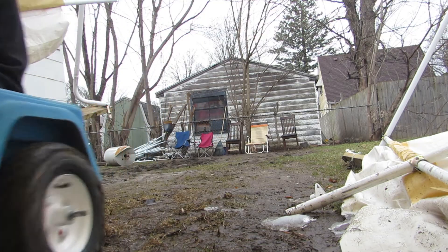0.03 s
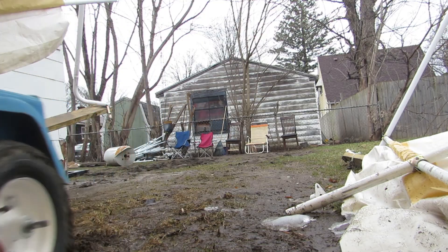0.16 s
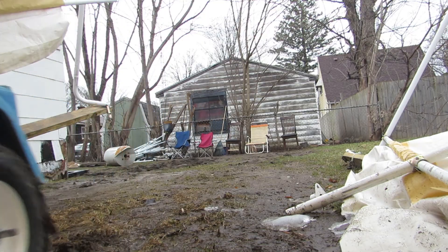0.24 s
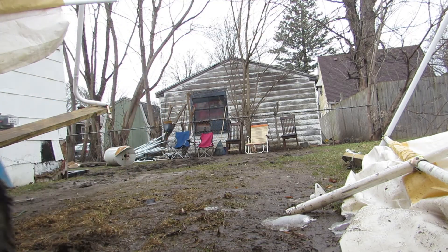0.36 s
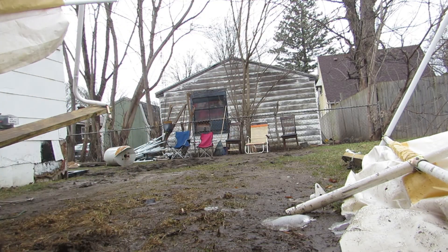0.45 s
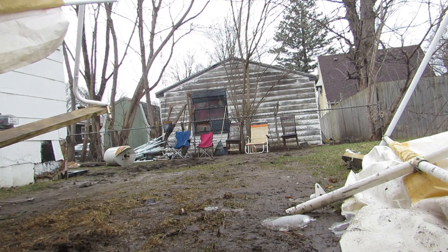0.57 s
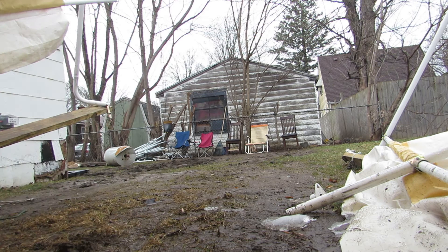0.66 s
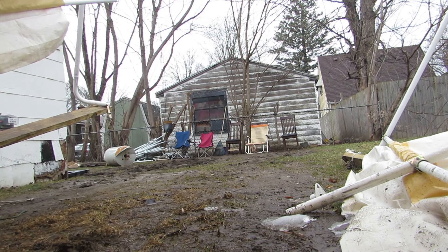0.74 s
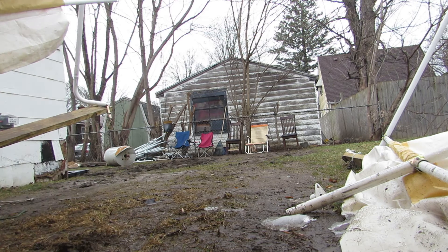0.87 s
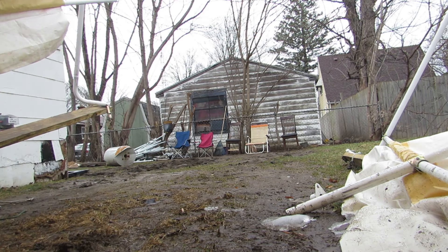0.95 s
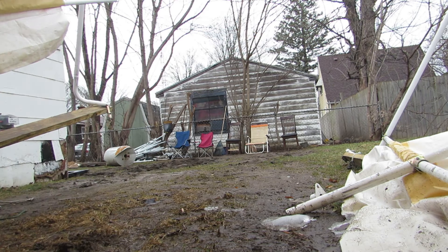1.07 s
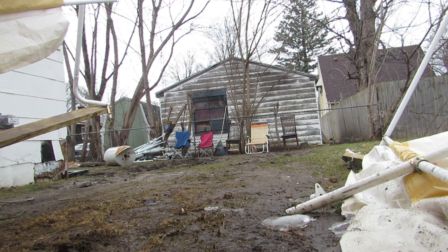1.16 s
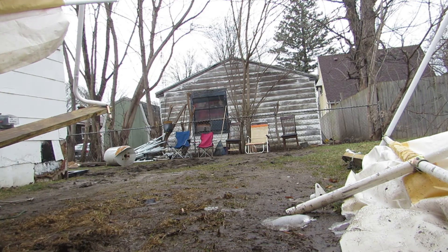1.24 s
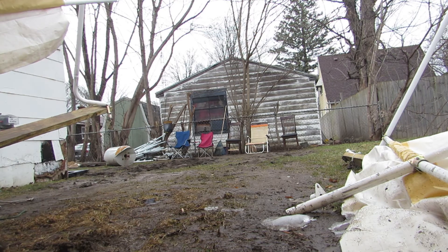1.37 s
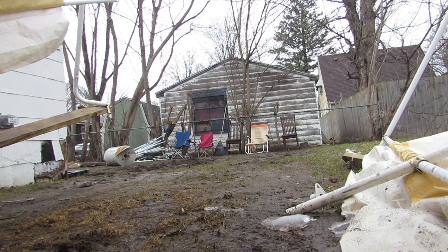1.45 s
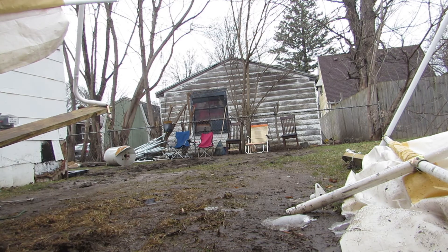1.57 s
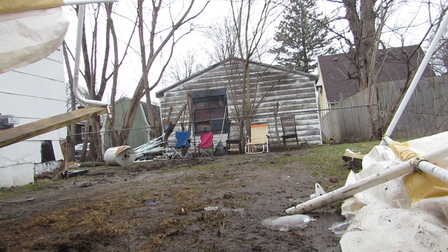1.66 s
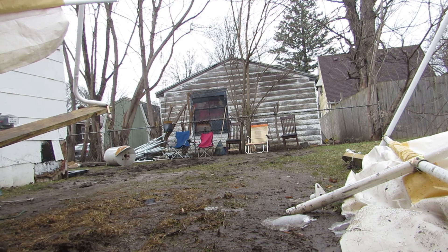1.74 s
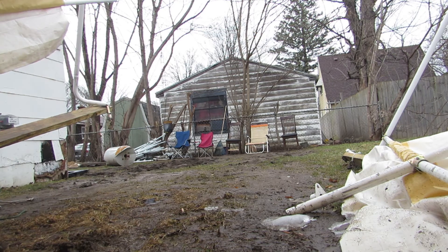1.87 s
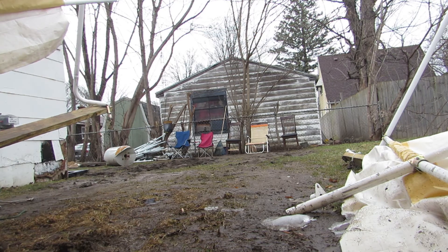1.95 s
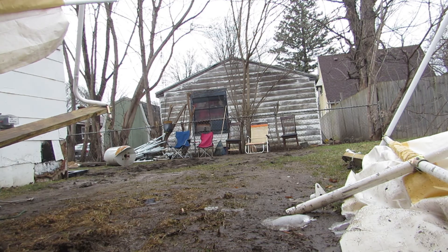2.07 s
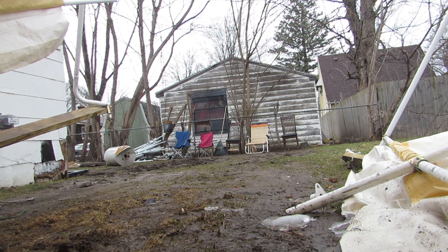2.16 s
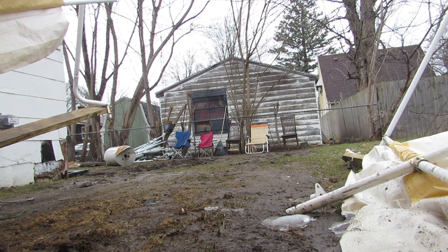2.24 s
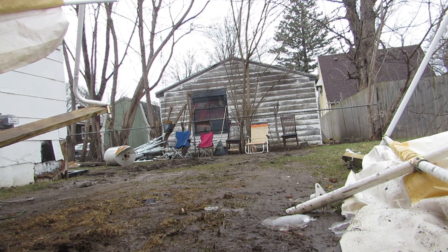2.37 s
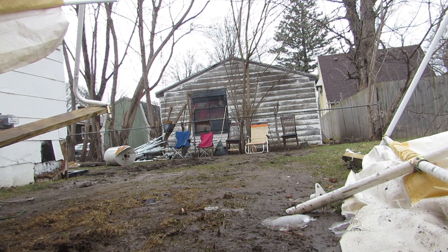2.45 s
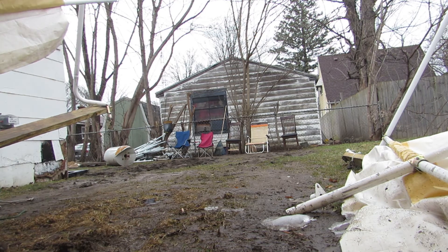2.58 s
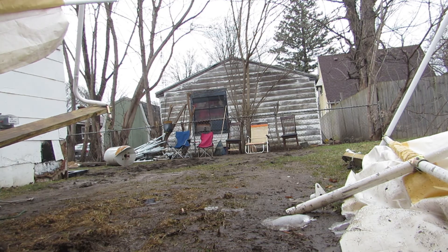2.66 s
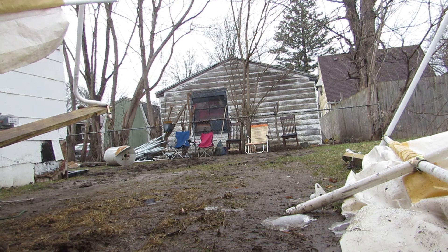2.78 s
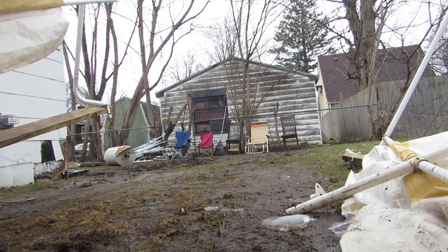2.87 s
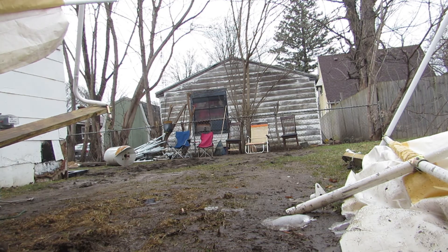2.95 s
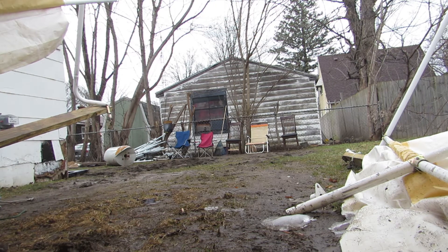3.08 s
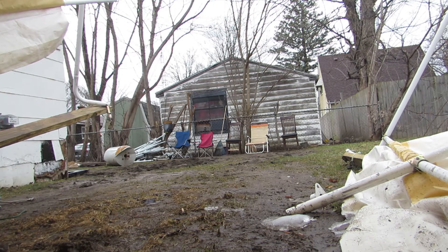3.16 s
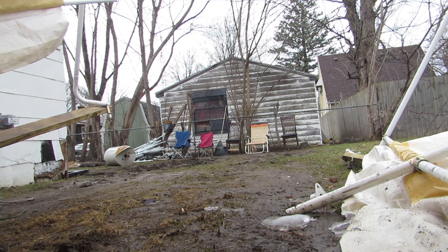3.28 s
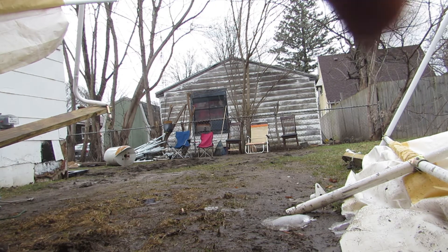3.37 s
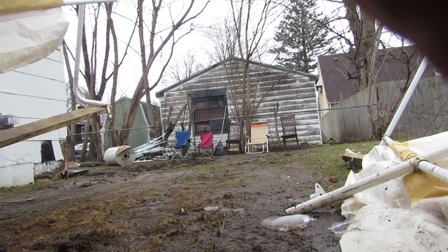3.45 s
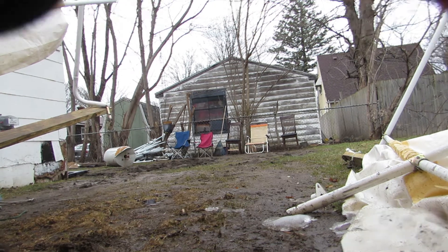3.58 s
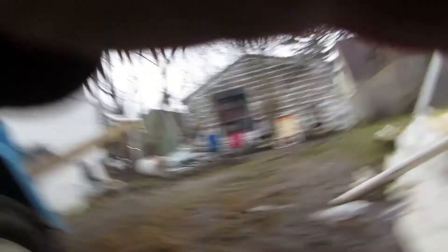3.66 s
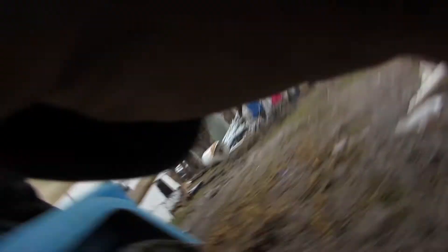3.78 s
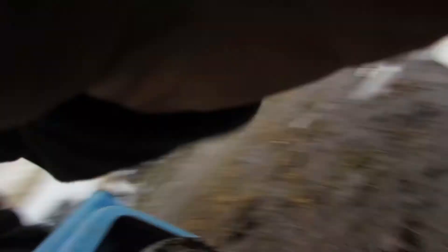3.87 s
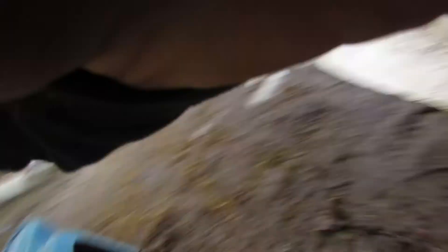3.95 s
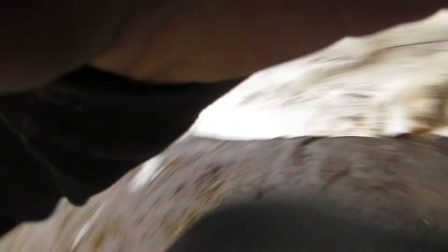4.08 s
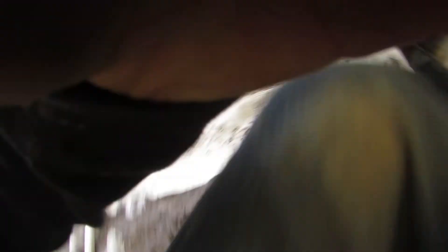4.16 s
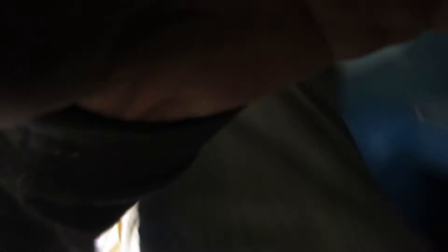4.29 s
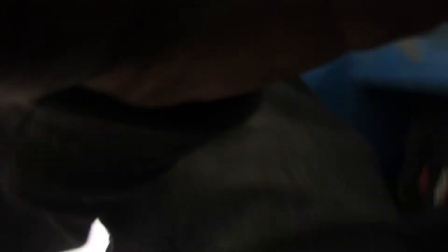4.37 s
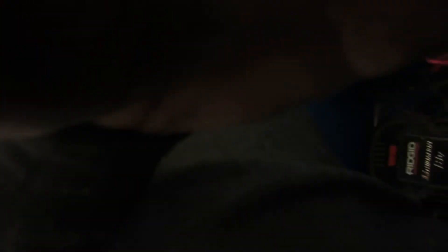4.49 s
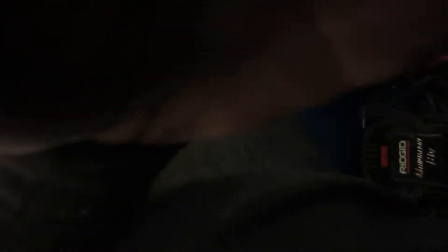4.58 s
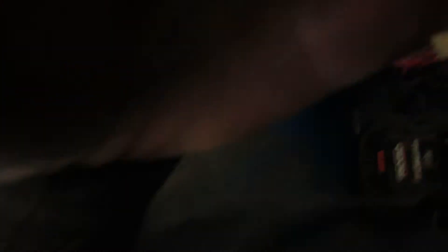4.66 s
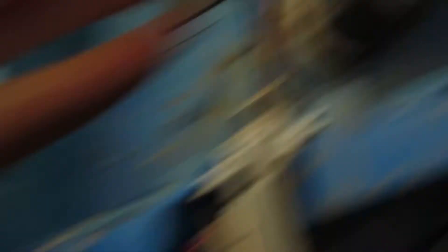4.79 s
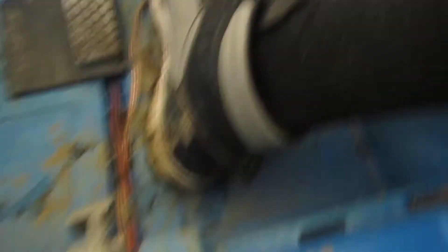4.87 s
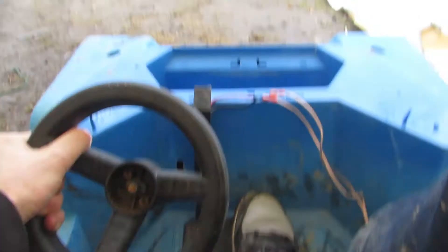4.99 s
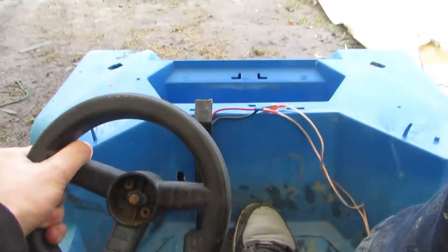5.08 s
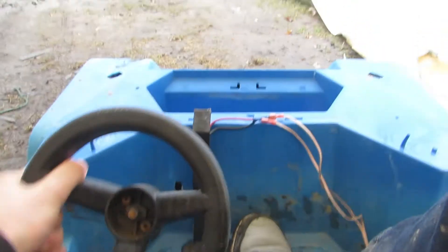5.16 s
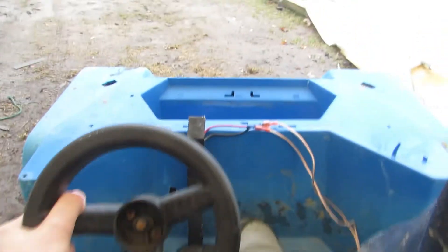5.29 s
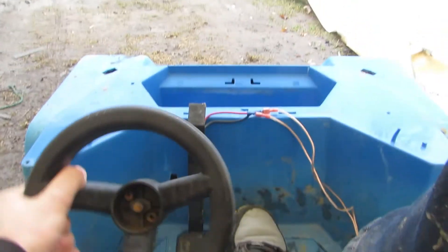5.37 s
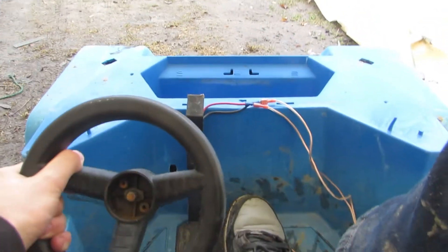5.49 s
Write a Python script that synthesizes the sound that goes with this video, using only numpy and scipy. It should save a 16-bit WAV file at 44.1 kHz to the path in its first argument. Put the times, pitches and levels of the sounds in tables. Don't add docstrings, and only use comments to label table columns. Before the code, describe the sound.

At the start a battery ride-on toy, close and slightly left, gives a gritty electric gear whine with hum and brush hiss, cutting off by about 0.3 s. Short squeals glide through it, and a cluster of squeaky chirps follows near 0.4 s amid plastic knocks, scraping and mud swishes until 0.7 s. Then it is quiet: faint far traffic rumble and wash slowly rise as the gain recovers, with muted shell bumps around 0.9-2.0 s. Soft bumps at 2.6 s lead into a loud hollow double knock at 2.65-2.7 s, then a lull. From 3.4 s cloth and strap brush the camera, with crisp clicks near 3.6 s. Heavy low wind buffets burst at 3.9-4.1 s and again around 4.4 s, with rustling. Case taps clatter at 4.7-4.9 s; sound drops out for an instant at 5.0 s, then low ambience, small taps and a soft bump at 5.26 s.

```python
import sys
import numpy as np
from scipy import signal
from scipy.fft import rfft, irfft, next_fast_len
from scipy.io import wavfile
from scipy.ndimage import uniform_filter1d

SR = 44100
rng = np.random.default_rng(int(sys.argv[2]) if len(sys.argv) > 2 else 0)


def invert_db(level):
    return 10 ** (np.asarray(level, dtype=float) / 20)


def store_wav(level_fs):
    pcm = np.round(np.clip(np.atleast_2d(level_fs), -1, 1) * 32767)
    wavfile.write(sys.argv[1], SR, pcm.T.astype(np.int16))


N = 243873
T = np.arange(N) / SR
GEAR_SAMPLES = 16384
TOY_AIM = dict(spread=0.67, left_db=1.5, lead_rad=0.35)


def unit(x):
    return x / np.sqrt(np.mean(x ** 2))


def colour(x, shape):
    hz, db = np.transpose(shape)
    n = next_fast_len(x.shape[-1], real=True)
    f = np.maximum(np.arange(n // 2 + 1) * SR / n, 1)
    gain = invert_db(np.interp(np.log(f), np.log(hz), db))
    return irfft(rfft(x, n) * gain, n)[..., :x.shape[-1]]


def walk(rate, size=N):
    k = int(SR / rate)
    steps = np.repeat(rng.standard_normal(size // k + 1), k)
    return unit(uniform_filter1d(uniform_filter1d(steps, k), k)[:size])


def ring(x, hz, width):
    return signal.lfilter(*signal.iirpeak(hz, hz / width, fs=SR), x)


def grit(spread_db, rate, size=N):
    k = int(SR / rate)
    grain = np.repeat(invert_db(spread_db * rng.exponential(size=size // k + 1)), k)[:size]
    return unit(rng.standard_normal(size) * uniform_filter1d(grain, k))


def held(start_db, swell_db_s, off_s, fall_db_s):
    t = T[:GEAR_SAMPLES]
    return start_db + swell_db_s * np.minimum(t, off_s) - fall_db_s * np.maximum(t - off_s, 0)


def ports(mid, other, spread=1., left_db=0., lead_rad=0.):
    port_width = [(60, -22.5), (110, -14.5), (200, -15.5), (370, -8), (690, -7), (1270, -7.5), (2340, -2.5),
                  (4320, -3.5), (7950, 1), (14600, 4.5)]
    sign = np.array([[1], [-1]])
    if lead_rad:
        turned = signal.hilbert(mid, next_fast_len(N))[:N] * np.exp(.5j * lead_rad * sign)
        mid = np.real(turned) * invert_db(left_db * sign / 2)
    return mid + spread * colour(other, port_width) * sign


def motor():
    # time_s [s], shaft_hz [Hz], mesh_db [dB load on the teeth]
    drive = [
        (0.0, 175.2, -55),
        (0.02, 175.7, -43),
        (0.05, 176.9, -42),
        (0.064, 179.1, -44.5),
        (0.114, 179.6, -33.5),
        (0.15, 178.1, -35.5),
        (0.168, 176, -44),
        (0.204, 174.7, -53),
        (0.3, 186, -80.5),
    ]
    # shaft_multiple [ratio], level_db [dB]
    teeth = [(15.4, -7), (16.1, -4), (16.5, -8), (3.03, -1.5), (3.2, -6), (3.77, -3), (4.8, -2.5),
             (5.75, -6), (7.17, 0)]
    # shaft_multiple [ratio], level_db [dB re hiss]
    whirr = [(20.3, -16.5), (23.2, -16), (27.95, -14.5), (30.5, -18), (34.8, -18), (38.6, -17), (29.4, -16)]
    # mode_hz [Hz], width_hz [Hz], level_db [dB]
    gearbox = [(560, 30, -1), (712, 16, -0.5), (996, 51, -3), (1296, 92, 0), (1943, 63, -4.5)]
    # band_hz [Hz], density_db [dB per Hz]
    brush = [(1290, -32), (2200, -12.5), (2440, -17.5), (2840, -7), (3890, -13), (7300, -16), (8400, -22.5),
             (13300, -26.5), (15000, -69)]
    n = GEAR_SAMPLES
    t = T[:n]
    time_s, shaft_hz, mesh_db = np.transpose(drive)
    hz, whine_db = np.interp(t, time_s, shaft_hz), np.interp(t, time_s, mesh_db)
    turn = np.cumsum(hz * (1 + .0012 * walk(40, n))) / SR
    puff = 1 + 0.091 * np.cos(2 * np.pi * turn)

    def mesh_line(multiple, db, rate):
        return invert_db(db + 3.2 * walk(rate, n)) * np.sin(2 * np.pi * multiple * turn)

    hum = invert_db(held(-51, 29.5, 0.23, 600) + 5.5) * np.sin(2 * np.pi * turn)
    lines = [mesh_line(k, db, 46.7) for k, db in teeth]
    whine = invert_db(whine_db + 2.5) * sum(lines[:3])

    body = sum(invert_db(db) * ring(grit(1.527, 600, n), f, w) for f, w, db in gearbox)
    body = unit(body + 0.65 * ring(grit(2.9, 600, n), 920, 950))
    growl = invert_db(held(-41.5, 31, 0.15, 212)) * (0.95 * body * puff + 0.38 * sum(lines[3:]))

    hiss_db = held(-41.5, 2, 0.15, 289)
    hiss = invert_db(hiss_db + 5.0) * puff * unit(colour(grit(0.55, 900, n), brush))
    hiss = hiss + invert_db(hiss_db + 5.5) * sum(mesh_line(k, db, 62) for k, db in whirr)
    running = t <= time_s[-1]
    return np.pad(running * (hum + growl + whine + hiss), (0, N - n))


def ducking():
    ducks = [
        (-.1, 13, 0.15),
        (-.1, 10.5, 2.3),
        (.64, 3, 0.33),
        (2.67, 11, 0.26),
        (3.73, 2.5, 0.13),
        (3.941, 14.5, 0.35),
        (4.92, 3.5, 0.23),
    ]
    attack_s = 0.0093
    total_db = 0
    for s, db, back in ducks:
        since = np.maximum(T - s, 0)
        total_db = total_db + db * (1 - np.exp(-since / attack_s)) * np.exp(-since / back)
    return total_db


def town():
    # band_hz [Hz], density_db [dB per Hz]
    rumble = [(12, -36.5), (20, -18), (60, 1.5), (108, 1), (173, -0.5), (200, -4), (280, -15), (367, -21.5),
              (500, -21), (650, -65), (1100, -120)]
    # band_hz [Hz], density_db [dB per Hz]
    far_wash = [(150, -33.5), (250, -4), (438, -12.5), (957, -12), (2440, -30.5), (3660, -34), (3990, -36),
                (8280, -40.5), (8710, -43.5), (12000, -46.5), (13500, -58), (14500, -74)]
    # centre_s [s], half_length_s [s], level_db [dB]
    presses = [
        (0.078, 0.071, -50),
        (0.465, 0.17, -45.5),
        (1.454, 0.15, -56.5),
        (2.56, 0.3, -61),
        (3.598, 0.12, -55.5),
        (4.894, 0.17, -55.5),
    ]
    duck_db = ducking()
    tread_power = sum(invert_db(db) ** 2 * np.exp(-2 * ((T - s) / half) ** 2) for s, half, db in presses)
    wash_gain = np.sqrt(invert_db(-56 - 0.77 * duck_db) ** 2 + tread_power)
    low = unit(colour(rng.standard_normal((2, N)), rumble)) * invert_db(-48 - duck_db + 3.0 + 1.9 * walk(11))
    wash = unit(colour(rng.standard_normal((2, N)), far_wash)) * wash_gain * invert_db(0.32 * walk(8))
    return ports(*(low + wash))


def squeals():
    chirps = [(0.015, 0.038, 3230, 3310, -39), (0.092, 0.19, 580, 714, -49), (0.169, 0.187, 780, 784, -37),
              (0.389, 0.403, 1090, 1280, -40), (0.401, 0.43, 1200, 1440, -40),
              (.443, 0.468, 1600, 1100, -48), (.388, .402, 2800, 3050, -48),
              (0.406, 0.424, 2870, 2800, -43.5), (0.418, 0.437, 3340, 3440, -37.5),
              (0.434, 0.454, 3410, 3460, -39.5), (.452, .47, 3440, 3470, -55), (0.674, 0.73, 610, 585, -64),
              (.752, 0.78, 580, 564, -56.5), (.708, .762, 985, 1000, -61.5), (.814, .845, 530, 460, -62),
              (0.19, 0.195, 1300, 1190, -46), (0.036, .235, 760, 500, -48.5),
              (0.11, 0.052, 2895, 3300, -39.5), (1.913, 2.095, 12400, 12000, -82)]
    out, n = np.zeros(N), GEAR_SAMPLES
    for t0, t1, hz0, hz1, db in chirps:
        x = np.clip(T[:n] / (t1 - t0), 0, 1)
        scatter_hz = min(0.04 * hz0, 90)
        hz = hz0 + (hz1 - hz0) * x + .6 * scatter_hz * np.tanh(walk(scatter_hz + 90, n))
        swell = invert_db(db + 2.0 + 3.6 * walk(171, n)) * np.abs(np.sin(np.pi * x)) ** 0.36
        i = max(int(t0 * SR), 0)
        out[i:i + n] += swell * np.sin(2 * np.pi * np.cumsum(hz) / SR)
    return out


def rustle():
    # start_s [s], length_s [s], level_db [dB], fade_db [dB], body_db [dB
    strokes = [(0.187, 0.057, -48, -11, 7), (2.875, 0.15, -74.5, -3, 0.1), (0.241, .16, -62, 11, 0),
               (0.399, 0.097, -45, -8.5, 1.5), (0.499, 0.06, -54.5, 8.5, 5), (0.562, .1, -47.5, -24.5, 4.5),
               (.66, 0.2, -77, 0, 10.5), (0.887, .6, -73, 5.5, -4.5), (1.426, 0.054, -75, -10, 3),
               (1.485, 0.18, -65, -7, -2), (1.832, 0.17, -68, -6, -7), (2.651, 0.15, -51.5, -22, 3.5),
               (3.397, 0.067, -63, 5.5, 3.5), (3.468, 0.059, -64.5, 7.5, 3), (3.533, .03, -77, -10, 8),
               (3.623, 0.1004, -66, 13.5, 0.5), (3.729, 0.042, -69, -15, 10), (4.248, 0.027, -75.5, 7, 5.5),
               (4.346, 0.041, -50.5, -7.5, 7.5), (4.393, 0.1, -58, -5, 3), (4.501, 0.038, -60.5, 3.5, 2),
               (4.541, 0.172, -59.5, 1, 0), (4.713, 0.078, -61, -6.5, 3), (4.798, 0.087, -60, -12, 1),
               (4.883, 0.023, -64.5, 8, 5), (4.907, 0.058, -67, -11, -2), (5.01, .13, -69.5, -9, 11)]
    # band_hz [Hz], density_db [dB per Hz]
    cloth = [(880, -21), (1500, -1.5), (3670, 1), (3970, -2), (4810, -3), (8100, -9), (12000, -14),
             (14200, -16), (15000, -56)]
    shell = [(150, -35.0), (400, -1), (1000, 0.0), (2000, -7), (4000, -27.5)]
    top = unit(colour(grit(2.0, 500) * rng.standard_normal((2, N)), cloth)) * invert_db(2.6 * walk(40))
    low = unit(colour(grit(2.2, 300) * rng.standard_normal((2, N)), shell)) * invert_db(2.4 * walk(30))
    gains = np.zeros((2, N))
    for s, length, db, fade_db, body_db in strokes:
        i, n = int(s * SR), int(length * SR)
        gains[:, i:i + n] += invert_db(db + np.linspace(0, fade_db, n) + np.array([[0], [body_db - 1]]))
    gains = uniform_filter1d(gains, size=400)
    return ports(*(gains[0] * top + gains[1] * low))


def blows(table, ring_hz, t60_ms, rise_ms, modal, noisy, ring_db, crack_db, crack_speed, crack_shape, **aim):
    out, t = np.zeros((2, N + 4096)), np.arange(4096) / SR
    push = np.sin(np.pi / 2 * np.minimum(t * 1000 / rise_ms, 1)) ** 2
    fall = np.exp(-np.log(1000) * t * 1000 / t60_ms)
    rattle_shape = [(900, -6.0), (1500, -2.5), (3600, -6), (6000, -34.0)]
    for s, db, hz, high_db, top_db in table:
        size, phase = rng.random((4, 1)), rng.random((2, 5, 1))
        noise = rng.standard_normal((3, 2, len(t)))
        modes_hz = np.r_[hz, ring_hz * (1 + .04 * (size[::-1, 0] - .5))]
        tones = np.sin(2 * np.pi * (modes_hz[:, None] * t + phase))
        thud_shape = [(hz / 4, -22), (hz, 0), (hz * 2.78, -15), (hz * 8, -55)]
        thud = tones[:, 0] + noisy * unit(colour(noise[0], thud_shape))
        rings = modal * (size * tones[:, 1:]).sum(axis=1) + noisy * unit(colour(noise[1], rattle_shape))
        crack = fall ** (crack_speed - 1) * unit(colour(noise[2], crack_shape))
        hit = thud + invert_db(high_db + ring_db) * rings + invert_db(top_db + crack_db) * crack
        i = int(s * SR)
        out[:, i:i + len(t)] += invert_db(db - 2.0) * push * fall * hit
    return ports(*out[:, :N], **aim)


def shell_blows():
    knocks = [(0.294, -42.5, 904, 4.5, -6), (0.356, -33.5, 224, -5, -15), (0.391, -38, 1110, -3, -15),
              (0.456, -38, 231, 3, -11.5), (.49, -41, 800, -7, -25), (0.508, -39.5, 600, -8, -26),
              (0.556, -37.5, 594, -2, -16), (0.514, -38, 904, -6, -22), (0.905, -44.5, 417, -8, -34),
              (0.945, -46.5, 503, -11, -34), (1.011, -43.5, 211, -8.5, -19), (1.28, -48, 228, 3.5, -14.5),
              (1.394, -33.5, 560, -6.5, -29), (1.398, -36.5, 1050, -7, -30), (1.518, -40, 594, -12.5, -28),
              (1.547, -38.5, 474, -9, -27), (1.547, -41.5, 790, -11, -27), (2.656, -24, 783, -19, -17.5),
              (2.664, -26.5, 952, -2.5, -20), (2.666, -27.5, 259.5, -19, -30), (2.675, -34, 414, 1.5, -15),
              (2.684, -30.5, 692, 3.5, -7.5), (2.688, -27.5, 910, -2.5, -16), (2.691, -33, 254, -20, -30),
              (2.693, -28, 419, 0, -23), (2.703, -43, 502, -2, -17), (2.819, -54, 297, -7, -17)]
    # start_s [s], thud_db [dB], thud_hz [Hz]
    bumps = [(1.177, -46.5, 452), (1.562, -36.5, 430), (1.635, -45, 336), (1.809, -44.5, 522),
             (1.811, -32, 288), (2.015, -44, 201), (2.578, -32.5, 215), (2.575, -51, 900),
             (2.587, -34.5, 326), (2.604, -34, 326), (5.263, -40.5, 239)]
    soft = [(*bump, -29, -38.5) for bump in bumps]
    crack_shape = [(2500, -41), (4200, 4.5), (12000, -3.5), (14000, -8), (16000, -16)]
    return blows(knocks + soft, np.array([1532, 1970, 2550, 3490]), t60_ms=78, rise_ms=3.3, modal=0.3,
                 noisy=0.66, ring_db=-0.5, crack_db=3.5, crack_speed=0.68, crack_shape=crack_shape, **TOY_AIM)


def swishes(table, **aim):
    out = np.zeros((2, N))
    for s, length, hz, width, db in table:
        i, n = int(s * SR), int(length * SR)
        band = ring(ring(rng.standard_normal((2, 8192)), hz, width), hz, width)[:, -n:]
        band = band / np.sqrt(np.mean(band ** 2, axis=1, keepdims=True))
        out[:, i:i + n] += invert_db(db) * np.sin(np.pi * np.linspace(0, 1, n) ** 0.6) ** 2 * band
    return ports(*out, **aim)


def mud_swishes():
    mud = [(.355, .025, 550, 210, -37), (.355, 0.028, 208, 90, -36.5), (.36, 0.04, 2500, 3460, -50),
           (.452, 0.021, 1000, 900, -40), (.506, .016, 700, 600, -43.5), (.506, .012, 180, 100, -41),
           (.51, 0.067, 520, 200, -44.5), (.555, 0.014, 4940, 1200, -48), (.66, 0.055, 3680, 1500, -64.5),
           (.899, 0.029, 790, 700, -54.5), (.905, 0.03, 5170, 2000, -66), (.943, 0.038, 1300, 400, -57),
           (.95, .03, 3650, 600, -60.5), (1.058, 0.099, 9000, 8000, -68), (1.28, 0.016, 1970, 460, -54.5),
           (1.442, 0.042, 5070, 1200, -60.5), (1.455, 0.054, 10200, 5000, -63),
           (.36, .035, 11500, 5000, -53), (1.955, 0.065, 10000, 5000, -71), (2.589, .016, 392, 150, -32),
           (2.63, .03, 250, 200, -46), (2.657, 0.015, 2500, 400, -34), (2.661, .013, 880, 300, -28),
           (2.69, 0.013, 368, 247, -28.5), (2.692, .014, 2200, 2000, -33.5), (2.7, 0.036, 2000, 1800, -45),
           (2.913, 0.037, 1550, 600, -60)]
    return swishes(mud, **TOY_AIM)


def wind():
    # peak_s [s], peak_db [dB]
    swings = [(3.382, -45), (3.781, -53), (3.931, -23), (4.06, -24), (4.141, -30), (4.28, -35),
              (4.379, -23.5), (4.47, -29.5), (4.6, -43), (4.682, -45), (4.924, -42)]
    # band_hz [Hz], density_db [dB per Hz]
    buffet = [(8.8, -40), (15, -7), (86, 1), (113, -0.5), (145, -6), (204, -6.5), (383, -29.5),
              (441, -34.5), (600, -47), (780, -79), (1320, -120)]
    # centre_s [s], pitch_hz [Hz], peak_db [dB]
    gusts = [(3.385, 80, -35), (3.91, 176, -17), (3.934, 74.5, -16.5), (3.962, 90, -18),
             (4.057, 138.4, -23.5), (4.105, 115, -26), (4.141, 55, -35), (4.285, 90, -26),
             (4.362, 110, -28), (4.395, 100, -23), (4.451, 90, -26), (4.5, 160, -25), (4.665, 70, -35),
             (4.721, 70, -37)]
    rise_db_s, fall_db_s = 300, 188
    db = np.max([top - np.maximum(rise_db_s * (s - T), fall_db_s * (T - s)) for s, top in swings], axis=0)
    eddies = invert_db(db - 1.5) * unit(colour(rng.standard_normal((2, N)), buffet) * invert_db(0.75 * walk(30)))
    for s, hz, peak_db in gusts:
        cycles = (T - s) * hz
        burst = np.exp(-(cycles / 0.65) ** 2) * np.sin(2 * np.pi * (cycles + rng.random()))
        eddies[0] += invert_db(peak_db) * burst
    return eddies[0] * np.array([[.86], [-1.14]]) + 0.17 * eddies[1]


def buckle_swishes():
    strap = [(3.407, 0.065, 8750, 1400, -64.5), (3.54, .016, 446, 400, -41), (3.542, .014, 2000, 300, -48),
             (3.563, .03, 176, 151, -44), (3.586, .007, 1910, 497, -42), (3.595, .02, 250, 200, -42),
             (3.598, .01, 3000, 500, -46), (3.6095, 0.0088, 2790, 500, -32),
             (3.6095, .007, 1940, 500, -27.5), (3.609, .016, 560, 300, -34.5),
             (3.6095, .008, 4530, 600, -38), (3.609, 0.0056, 6500, 4000, -42.5),
             (3.614, .02, 1730, 250, -47), (3.618, .035, 2730, 250, -56), (3.675, 0.022, 2770, 500, -53),
             (3.708, 0.02, 1700, 500, -52), (3.737, .016, 11000, 6000, -72),
             (3.783, 0.0072, 2600, 2500, -43.5), (3.783, .007, 6000, 5000, -52.5),
             (4.142, .006, 2460, 2000, -51), (4.349, .048, 2600, 3000, -51),
             (4.714, 0.039, 1844, 220, -38.5), (4.719, 0.025, 2730, 300, -43.5),
             (4.73, 0.029, 1740, 120, -50), (4.795, .05, 1410, 600, -43.5), (4.795, .03, 2720, 700, -45),
             (4.798, 0.02, 7600, 7000, -49)]
    return swishes(strap)


def case_snaps():
    snaps = [(3.534, -50, 890, 1, -21), (3.548, -52, 1490, 0, -21), (3.539, -32, 478, -5.5, -42),
             (3.556, -36, 355, 0, -12), (3.571, -44, 800, 1, -7), (3.581, -45, 500, 2, -3),
             (3.587, -40, 1910, 1.5, -25), (3.598, -36, 700, 1, -6.5), (3.605, -39, 500, -5, -9.5),
             (3.61, -32, 558, 1, -11), (3.652, -45, 445, 1, -20), (3.689, -43, 2700, 1, -19),
             (3.714, -40.5, 382, 0.5, -12.5), (3.72, -49.5, 910, 5, -10), (3.784, -39, 1090, -1.5, -2),
             (3.908, -37, 322, -36, -31), (4.053, -43.5, 495, -18, -36), (4.143, -49, 1300, -7, -4.5),
             (4.347, -37, 943, -7, -12), (4.355, -31, 283, -2.5, -11.5), (4.373, -40.5, 310, -3, -9),
             (4.715, -35.5, 301, -3, -34), (4.725, -30, 633, -2, -29), (4.796, -32, 1430, -0.5, -20),
             (4.8, -30.5, 986, -0.5, -24), (4.804, -33, 1560, -2, -20), (4.809, -37, 1190, -4, -21),
             (4.817, -36, 1100, -3, -29), (4.824, -37, 910, -5, -26), (4.833, -38.5, 1320, -4, -26),
             (4.84, -45, 700, -9, -26), (4.902, -29, 300, -6.5, -29), (4.906, -32.5, 614, -1.5, -5.5),
             (4.911, -34, 298, -9, -18.5), (4.987, -39, 836, -2.5, -9), (4.99, -38.5, 500, -1, -12),
             (5.015, -48, 1510, -2, -10), (5.178, -49, 1110, -17, -30)]
    crack_shape = [(2000, -32), (4200, -1), (8000, -1.0), (12000, -5.5), (14500, -4.5), (16000, -4)]
    return blows(snaps, np.array([1790, 2104, 2870, 3113]), t60_ms=30.1, rise_ms=1.34, modal=0.53, noisy=0.82,
                 ring_db=1.0, crack_db=11.0, crack_speed=2.34, crack_shape=crack_shape, spread=0.99)


def yard_echo(toy):
    t = np.arange(6000) / SR
    tail = rng.standard_normal((2, len(t))) * np.exp(-np.log(1000) * t / 0.15) * (t > .006)
    dull = signal.lfilter([.4], [1, -.6], tail)
    return invert_db(-37.5) * signal.fftconvolve(toy, dull, axes=1)[:, :N]


def scene():
    gears = ports(motor() + squeals(), motor() + squeals(), **TOY_AIM)
    toy = gears + shell_blows()
    ground = town() + rustle() + mud_swishes()
    handling = wind() + buckle_swishes() + case_snaps()
    return toy + yard_echo(toy) + ground + handling


def top_cut(x):
    return signal.sosfilt(signal.butter(12, 15240, fs=SR, output="sos"), x)


def record(dry):
    notches = [(3925, 280, .8), (7890, 280, .75)]
    # start_s [s], end_s [s]
    dropout = (4.9936, 5.0152)
    # before_hz [Hz before dropout], after_hz [Hz after], level_db [dB]
    circuit = (8305, 8005, -87)
    x = colour(dry, [(11000, 0), (13000, 0.5), (14500, -11), (15500, -30), (17000, -22)])
    x = .26 * np.tanh(x / .26)
    for hz, width, depth in notches:
        x = x - depth * ring(x, hz, width)
    before_hz, after_hz, whistle_db = circuit
    whistle_hz = np.where(T < dropout[0], before_hz, after_hz)
    whistle_gain = invert_db(whistle_db + 5.5 - 0.81 * ducking() + 1.5 * walk(7.2))
    x = x + whistle_gain * np.sin(2 * np.pi * whistle_hz * T)
    sounding = (T < dropout[0]) | (T > dropout[1])
    return top_cut(x * sounding)


dry = scene()
out = record(dry)
store_wav(out)
```